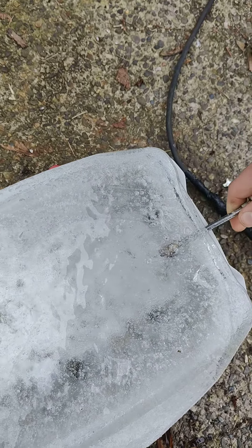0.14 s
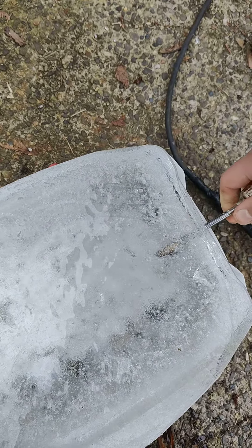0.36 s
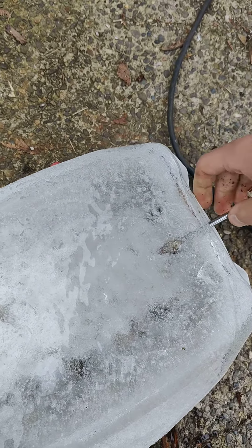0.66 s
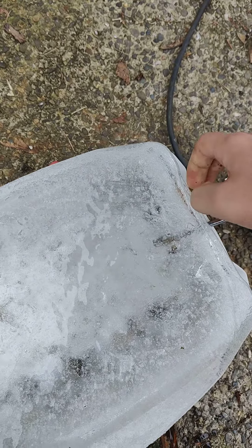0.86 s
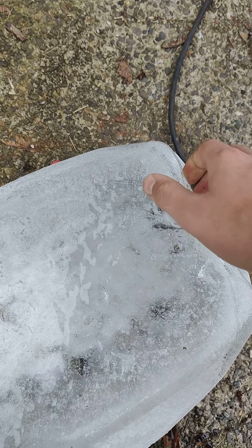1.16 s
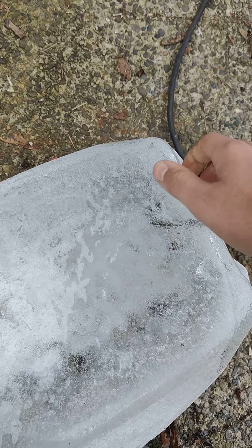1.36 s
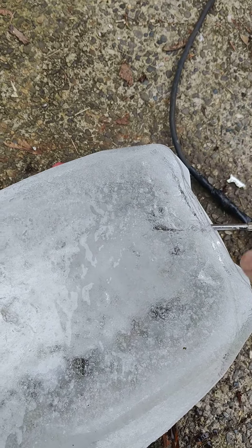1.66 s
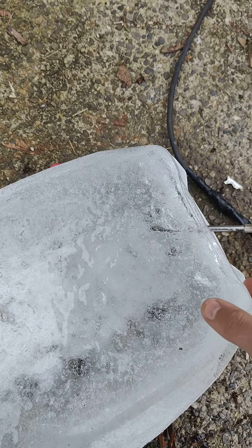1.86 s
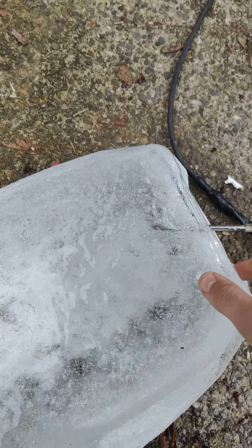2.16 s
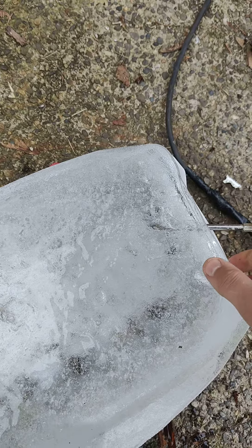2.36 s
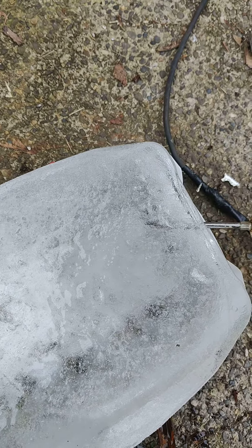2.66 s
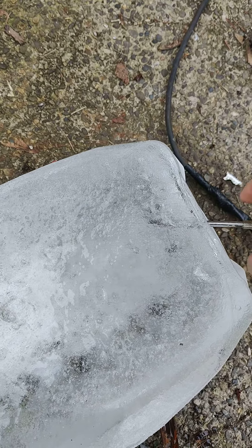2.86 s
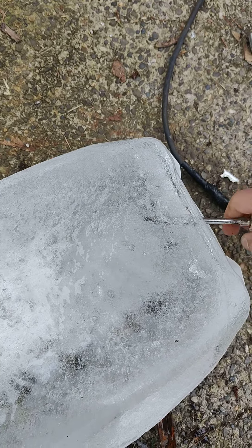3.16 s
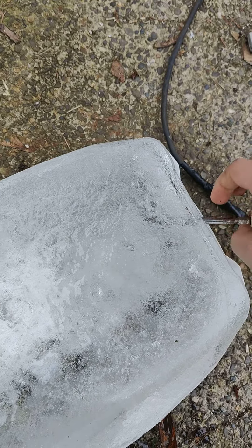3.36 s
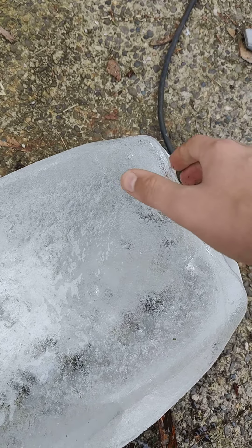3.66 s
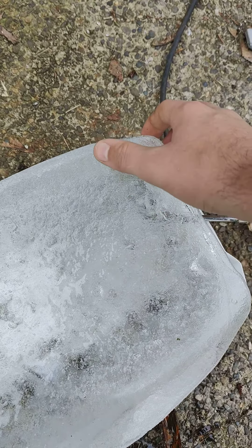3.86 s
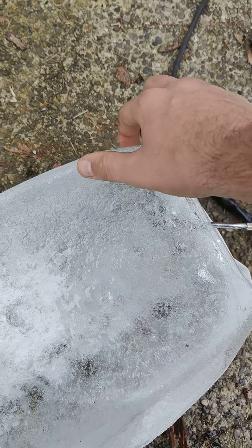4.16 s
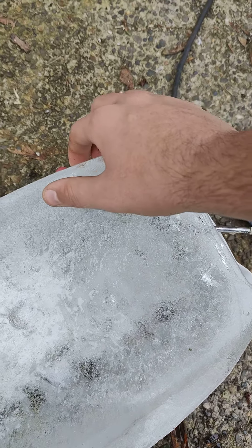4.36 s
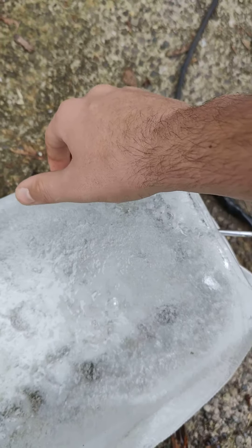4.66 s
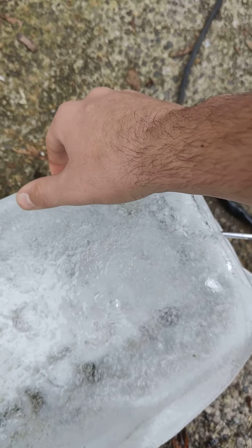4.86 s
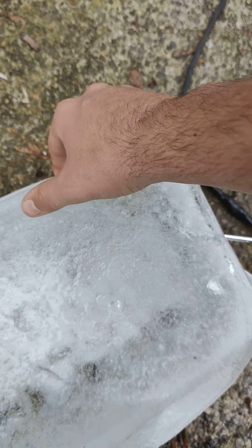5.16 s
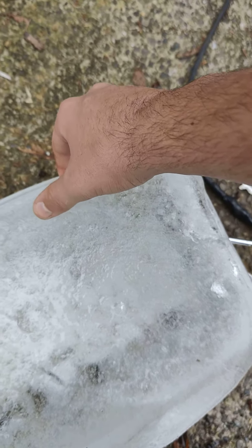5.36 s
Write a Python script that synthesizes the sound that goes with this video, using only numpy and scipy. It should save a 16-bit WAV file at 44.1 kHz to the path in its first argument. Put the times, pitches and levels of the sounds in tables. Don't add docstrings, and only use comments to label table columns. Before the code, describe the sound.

Close outdoor stereo phone pickup of a tub-shaped ice block on concrete being pried with a thin steel rod. Over low distant town rumble and soft hiss, one medium crack comes early, then faint ticks. A great double crack with a clear ring and hollow boom hits mid-way, followed by a tiny squeak, a lone sharp crack, and finally grinding and a cluster of heavy cracks.

```python
import sys
import numpy as np
from scipy import signal
from scipy.fft import rfft, irfft, next_fast_len
from scipy.io import wavfile
from scipy.ndimage import uniform_filter1d

SR = 44100
rng = np.random.default_rng(int(sys.argv[2]) if len(sys.argv) > 2 else 0)


def inscribe(sig):
    pcm = np.round(np.clip(np.atleast_2d(sig).T, -1, 1) * 32767)
    wavfile.write(sys.argv[1], SR, pcm.astype(np.int16))


def volts(x):
    e = np.asarray(x, float) / 20
    return 10 ** e


N = 242991
RING_LEN = 8192


def along(table, hz):
    f, v = np.transpose(table)
    return np.interp(np.log(np.maximum(hz, 1)), np.log(f), v)


def walk(rate):
    k = int(SR / rate)
    held = np.repeat(rng.standard_normal(N // k + 1), k)
    return uniform_filter1d(uniform_filter1d(held, k), k)[:N]


# frequency in Hz, level in dB per Hz.
TOWN_SPECTRUM = [(22, -5), (70, -1), (144, -8), (190, -6), (230, -12.5), (322, -20), (828, -23.5),
                 (1050, -19.5), (1700, -30.5), (3060, -27.5), (5480, -48.5), (7600, -51.5), (9200, -50.5),
                 (14000, -50.5)]
# frequency in Hz, shared fraction of power.
TOWN_COHERENCE = [(60, .995), (180, .99), (300, .95), (700, .6), (2000, .5), (6000, .3), (14000, .1)]
# frequency in Hz, left minus right in dB.
TOWN_BALANCE = [(60, 1.5), (110, 0.5), (200, -0.5), (380, 1), (700, 3), (1280, -1), (2370, 6), (4370, 9),
                (8060, 7.5), (14900, -0.5)]
TOWN_DB, TOWN_TOP_HZ, TOWN_LAG_S = -53.5, 14350, -.00043


def town():
    size = next_fast_len(N)
    hz = np.fft.rfftfreq(size, 1 / SR)
    shared = np.clip(along(TOWN_COHERENCE, hz), 0, 1)
    common, left, right = rfft(rng.standard_normal((3, size)))
    late = np.exp(-2j * np.pi * hz * TOWN_LAG_S)
    ports = np.sqrt(shared) * common * np.array([late, late ** 0])
    ports = ports + np.sqrt(1 - shared) * np.array([left, right])
    balance_db = along(TOWN_BALANCE, hz) * np.array([[.5], [-.5]])
    ports = ports * (hz < TOWN_TOP_HZ) * volts(along(TOWN_SPECTRUM, hz) + balance_db)
    out = 0
    swell = walk(1.0)
    octave = np.log2(np.maximum(hz, 20) / 20)
    for k in range(11):
        band = irfft(ports * np.clip(1 - abs(octave - k), 0, 1), size)[:, :N]
        out = out + band * volts(.6 * swell + 0.97 * walk(2.2) + 0.76 * walk(9))
    return out * volts(TOWN_DB) / np.sqrt(np.mean(np.mean(out, axis=0) ** 2))


# loudest moment in seconds,
# level in dB, half length in seconds.
MURMUR_SWELLS = [
    (0.337, -64.5, 0.16),
    (1.392, -67.5, 0.33),
    (1.77, -68.5, 0.3),
    (2.6, -66, 0.14),
    (5.19, -63.5, 0.075),
    (5.2, -61, 0.18),
]
DRONE_DB = -72


def low_murmur():
    band = signal.butter(N=2, Wn=[450, 640], btype="band", fs=SR, output="sos")
    drone = signal.sosfilt(band, rng.standard_normal((2, N)))
    t = np.arange(N) / SR
    near = volts(DRONE_DB) + sum(volts(db) * np.exp(-((t - s) / half_s) ** 2) for s, db, half_s in MURMUR_SWELLS)
    return drone / np.std(drone) * near * volts(-2.5 + 1.2 * walk(3.9))


def add(out, s, sound, db, pan_db):
    top = np.sqrt(uniform_filter1d(np.mean(sound ** 2, axis=0), size=132).max())
    gain = volts(db + np.array([[pan_db], [-pan_db]]) / 2) / top
    i = int(s * SR)
    out[:, i:i + RING_LEN] += (sound * gain)[:, :N - i]


def fade(t60):
    return np.exp(-np.log(1000) * np.arange(RING_LEN) / SR / max(t60, .004))


def excite(push, body):
    return signal.fftconvolve(np.atleast_2d(push), body, axes=1)[:, :RING_LEN]


YARD_T60_S, YARD_DB = 0.21, -22


def diffuse_swell(push, t60):
    decay = fade(t60)[None] ** 2 + (volts(YARD_DB) * fade(YARD_T60_S)[None]) ** 2
    return np.sqrt(excite(push ** 2, decay).clip(0))


def slips(run_ms, size):
    u = np.arange(RING_LEN) / SR / (max(run_ms, .3) / 1000)
    return (u + 0.17) * np.exp(-u * 2.0) * size


# frequency in Hz, lag of the right port in radians.
PORT_PHASE = [(250, 0.077), (440, 0.18), (900, 0.6), (1050, 1.9), (1700, 1.2), (2200, 3), (3200, 4.83)]
CROWD_SIZE, CROWD_LEN = 40, 3072


def crowd(band):
    low_hz, high_hz, t60 = band
    place, size, tilt, life = rng.random((4, CROWD_SIZE, 1))
    step = (np.arange(CROWD_SIZE)[:, None] + place) / CROWD_SIZE
    hz = low_hz * (high_hz / low_hz) ** step
    t = np.arange(CROWD_LEN) / SR
    body = volts(10.0 * size) * np.exp(-np.log(1000) * t / (t60 * (0.44 + 1.6 * life)))
    turn = 2 * np.pi * (hz * t + place * CROWD_SIZE)
    late = along(PORT_PHASE, hz) + 1.9 * (tilt - .5)
    return np.array([np.sum(body * np.sin(turn), axis=0), np.sum(body * np.sin(turn - late), axis=0)])


def crunch(band, push, noise):
    struck = excite(push, crowd(band))
    low_hz, high_hz, t60 = band
    hz = np.fft.rfftfreq(RING_LEN, 1 / SR)
    inside = 1 / (1 + (low_hz / np.maximum(hz, 1)) ** 8) / (1 + (hz / high_hz) ** 8)
    blur = diffuse_swell(push, t60) * irfft(rfft(noise) * inside)
    return struck / np.std(struck) + volts(-2.0) * blur / np.std(blur)


# frequency in Hz, level in dB per Hz.
SPLINTER_SPECTRUM = [(2590, -30.5), (4400, -2), (5800, -3), (6310, 2.5), (7810, -6.5), (9630, -7.5),
                     (13200, -7.5), (14600, -22.5), (15300, -42)]
# frequency in Hz, left minus right in dB.
SPLINTER_BALANCE = [(60, 7), (110, -1.5), (200, -1.5), (380, 2.5), (700, 0.5), (1280, -2), (2370, -4.5),
                    (4370, -5.5), (8060, 14.5), (14900, -6)]


def spray(noise):
    hz = np.fft.rfftfreq(noise.shape[1], 1 / SR)
    common, left, right = rfft(noise)
    late = np.exp(-2j * np.pi * hz * .0002)
    ports = np.array([common + .55 * left, common * late + 0.92 * right])
    balance_db = along(SPLINTER_BALANCE, hz) * np.array([[.4], [-.4]])
    return irfft(ports * volts(along(SPLINTER_SPECTRUM, hz) + balance_db), noise.shape[1])


# start in seconds, middle modes in dB, upper modes in dB, splinters in dB,
# run of slips in ms.
BIG_BREAKS = [
    (0.1863, -29, -23.5, -36, 3.24),
    (2.57, -15, -22, -38, 4.3),
    (2.6, -20, -19.5, -32.5, 1.4),
    (2.6294, -48.5, -41, -63.5, 1.35),
    (3.5087, -28.5, -32.5, -56, 1.73),
    (4.7752, -32.5, -27.5, -36.5, 4.8),
    (5.0786, -16.5, -18.5, -32, 4.8),
    (5.1351, -21.5, -26, -42.5, 4.3),
    (5.1585, -19.5, -28, -49, 5),
    (5.1956, -39, -39, -53, 2.8),
]
# start in seconds, middle modes in dB, upper modes in dB, splinters in dB.
HAIRLINE_TICKS = [(0.4532, -49, -46.5, -59), (0.469, -52, -79, -68), (0.587, -59, -76, -78),
                  (0.6393, -67, -65, -75), (0.6935, -59, -59, -69.5), (0.8592, -68, -59.5, -77),
                  (2.1944, -65, -77, -76.5), (2.3366, -51.5, -52.5, -58.5), (2.392, -57, -63, -69),
                  (2.4313, -52.5, -75, -73), (2.68, -57, -52, -66), (2.77, -61.5, -70, -76.5),
                  (3.3502, -79, -67, -80), (3.4239, -75.5, -61, -72.5), (4.7243, -61.5, -54, -67.5),
                  (4.7994, -51, -43.5, -77), (4.9243, -48, -55.5, -68), (5.005, -50.5, -56, -69),
                  (5.3845, -54, -77, -88.5), (5.396, -53, -55.5, -72.5), (5.4204, -64, -56.5, -73.5),
                  (5.4925, -59.5, -54.5, -68.5)]
MIDDLE, UPPER = (900, 2900, 0.067), (2400, 4500, 0.037)
TICK_RUN_MS, CRACK_PAN_DB = 5.5, 0.3
SPLINTER_T60_S = 0.032
GRAIN_DB, GRAIN_MS = 3, 2.1


def fractures():
    out = np.zeros((2, N))
    octaves = np.log2(np.maximum(np.fft.rfftfreq(RING_LEN, 1 / SR), 4000) / 7000)
    ticks = [(*tick, TICK_RUN_MS) for tick in HAIRLINE_TICKS]
    for s, middle_db, upper_db, splinter_db, run_ms in sorted([*BIG_BREAKS, *ticks]):
        grit = rng.standard_normal((6, RING_LEN))
        push = slips(run_ms, grit[0] ** 3)
        start = s - .0015
        add(out, start, crunch(MIDDLE, push, grit[4:]), middle_db - 1.85, CRACK_PAN_DB)
        add(out, start, crunch(UPPER, push, grit[4:]), upper_db - 4.5, CRACK_PAN_DB - 5.5)
        clumps = uniform_filter1d(grit[5, ::-1], max(int(GRAIN_MS * SR / 1000), 2))
        swell = diffuse_swell(push, SPLINTER_T60_S) * volts(GRAIN_DB * clumps / clumps.std())
        bright = volts(0.57 * np.clip(splinter_db - upper_db + 22, -12, 6) * octaves)
        hiss = irfft(rfft(spray(grit[1:4])) * bright)
        add(out, start, swell * hiss, splinter_db + 2.0, CRACK_PAN_DB + 0.5)
    return out


GRIP_S = 0.066


def ring(out, s, db, hz, t60, pan_db, rise_ms):
    t = np.arange(RING_LEN) / SR
    rise = (1 - np.exp(-t * 1000 / max(rise_ms, .2))) ** 2
    turn = 2 * np.pi * hz * t - np.array([[0], [along(PORT_PHASE, hz)]])
    choke = np.exp(-(t / GRIP_S) ** 4)
    add(out, s - .001, rise * fade(t60) * choke * np.sin(turn), db - 0.5, pan_db)


# frequency in Hz, creep in Hz per second, t60 in seconds,
# left minus right in dB, lag in ms.
LOW_SHORT_MODES = [(259, -0.5, 0.047, 5.5, 0.24), (508, 6, .04, 8.5, 1.5), (706, 1.5, .055, 4, 2.2),
                   (910.7, -7.5, .08, -7.5, 0.068)]
HIGH_SHORT_MODES = [(1225, 15, 0.038, 2, 0.1), (1618.5, 27.5, 0.042, -16.5, 4), (2096, 0.5, .026, -13, 1.5),
                    (3300, -25, 0.014, 9.5, 0.5)]
# start in seconds, then a level in dB for each of the four modes.
LOW_DRIVE = [(0.186, -69, -36, -71, -30), (2.567, -28, -22, -49, -27), (2.598, -48, -39, -37.5, -60),
             (2.657, -77, -51, -65, -54), (2.675, -80, -80, -72, -48.5), (3.507, -57.5, -40, -48, -36),
             (4.775, -58, -43, -51, -67.5), (5.077, -28, -20.5, -25.5, -23.5), (5.134, -43, -36, -37, -35),
             (5.156, -42, -29, -31, -53), (5.195, -80, -80, -72, -49), (5.388, -76.5, -78.5, -73.5, -60.5)]
HIGH_DRIVE = [(0.186, -34, -33, -31, -26.5), (2.571, -30, -35, -41, -43), (2.601, -52, -32, -28, -16.5),
              (3.5098, -31.5, -33, -31.5, -49), (4.7731, -44, -43.5, -38, -30.5),
              (5.078, -34.5, -24, -35, -26.5), (5.134, -23.5, -37, -50, -39), (5.155, -26.5, -38, -50, -43),
              (5.39, -50, -67, -82.5, -83)]
LOW_RISE_MS, HIGH_RISE_MS = 2.5, 0.79


def shorter_modes():
    out = np.zeros((2, N))
    low = (LOW_SHORT_MODES, LOW_DRIVE, LOW_RISE_MS)
    high = (HIGH_SHORT_MODES, HIGH_DRIVE, HIGH_RISE_MS)
    for modes, blows, rise_ms in (low, high):
        for s, *force_db in blows:
            for (hz, creep, t60, pan_db, lag_ms), db in zip(modes, force_db):
                ring(out, s + lag_ms / 1000, db, hz + creep * s, t60, pan_db, rise_ms)
    return out


# start in seconds, level in dB, left minus right in dB, build-up in ms.
BENDING_NOTES = [(0.187, -31, -2, 2.1), (0.4522, -54, -4.5, 1.3), (2.0768, -62, 0, 0.97),
                 (2.0937, -66.5, -16, 1.2), (2.3908, -66, -7, 1.6), (2.4354, -62, -13, 1),
                 (2.5685, -8, -3, 2.3), (2.5997, -40, -6, 1.3), (2.6573, -41.5, 0, 1.7),
                 (2.701, -49, -11, 0.69), (2.743, -60, -4.5, 3.9), (2.8274, -60, -2.5, 2.7),
                 (3.419, -63.5, -5.5, 1.65), (3.5057, -18, -8, 3.3), (4.772, -38, -9.5, 2.14),
                 (5.006, -57.5, -6, 1.5), (5.0819, -21.5, -9.5, 2.4), (5.1357, -38, -13, 1.5),
                 (5.1545, -23.5, -7, 0.66), (5.195, -51, -9, 1.5)]
LOOSE_S = 2.59
NOTE_HZ, NOTE_T60_S = (1010, 1042.7), 0.079


def bending_note():
    out = np.zeros((2, N))
    for s, db, pan_db, rise_ms in BENDING_NOTES:
        ring(out, s, db, NOTE_HZ[s > LOOSE_S], NOTE_T60_S, pan_db, rise_ms)
    return out


# start in seconds, level in dB, t60 in
# seconds, left minus right in dB.
HOLLOW_BOOMS = [(0.189, -30, 0.036, 0.5), (0.242, -49, 0.066, 2), (0.453, -49, 0.059, 1),
                (0.853, -59.5, 0.04, 2), (2.075, -43.5, 0.03, -.5), (2.092, -49, 0.056, 4),
                (2.348, -58, .065, -6), (2.418, -55, 0.09, 1), (2.567, -20, 0.058, 4),
                (2.584, -31, 0.036, -7), (2.597, -16.5, 0.11, 3), (2.668, -44, 0.059, -3),
                (2.701, -50.5, 0.066, -3.5), (3.506, -31.5, 0.033, 3.5), (4.177, -50, 0.015, -14),
                (4.519, -59.5, .088, 5), (4.583, -51, 0.026, -10.5), (4.735, -56, 0.14, 3),
                (4.777, -31.5, 0.093, 5), (4.819, -47, 0.047, -9), (4.92, -58, 0.076, 2.5),
                (4.962, -51, 0.056, 3.5), (5.007, -50.5, 0.11, 5.5), (5.0762, -10.5, 0.069, 4),
                (5.134, -32.5, 0.063, 5), (5.157, -24.5, 0.088, 5.5), (5.195, -42, 0.11, -2),
                (5.388, -54.5, 0.044, 3)]
BOOM_HZ, BOOM_RISE_MS = (413.7, 438.2), 3.4


def hollow_boom():
    out = np.zeros((2, N))
    for s, db, t60, pan_db in HOLLOW_BOOMS:
        ring(out, s, db, BOOM_HZ[s > LOOSE_S], t60, pan_db, BOOM_RISE_MS)
    return out


THUMP_HZ, THUMP_DB, THUMP_T60_S = 200, -11, 0.073


def ground_thump():
    out = np.zeros((2, N))
    for s, db, *_ in LOW_DRIVE:
        ring(out, s + 0.0045, db + THUMP_DB, THUMP_HZ, THUMP_T60_S, 1.5, LOW_RISE_MS)
    return out


# start in seconds, end in seconds, first level in dB, last level in dB.
GRINDS = [
    (2.307, 2.46, -82, -83),
    (2.609, 2.795, -77, -81),
    (4.7, 4.804, -84.5, -67.5),
    (4.808, 5.06, -72.5, -77.5),
    (5.2, 5.27, -75, -76),
    (5.37, 5.51, -81, -84),
]


def grind():
    t = np.arange(N) / SR
    bed = spray(rng.standard_normal((3, next_fast_len(N))))[:, :N] * volts(3.5 + 4.2 * walk(110))
    effort = 0
    for a, b, from_db, to_db in GRINDS:
        effort = effort + volts(np.interp(t, [a, b], [from_db, to_db], left=-140, right=-140))
    return bed / np.std(bed) * uniform_filter1d(effort, size=400)


# time in seconds, pitch in Hz, level in dB.
SQUEAK_PATH = [
    (2.696, 1050, -66),
    (2.704, 1200, -54),
    (2.712, 1650, -52),
    (2.719, 1770, -53),
    (2.738, 1780, -61),
    (2.755, 1830, -72),
]


def squeak():
    s, hz, db = np.transpose(SQUEAK_PATH)
    t = np.arange(N) / SR
    pitch = np.interp(t, s, hz) * (1 + .045 * walk(200))
    turn = 2 * np.pi * np.cumsum(pitch) / SR
    level_db = np.interp(t, s, db, left=-140, right=-140) + 2.5 * walk(160)
    return volts(level_db) * np.sin(turn - np.array([[0], [1.2]]))


def scene():
    block = shorter_modes() + bending_note() + hollow_boom() + ground_thump()
    return town() + low_murmur() + fractures() + block + grind() + squeak()


def band_limit(x):
    return signal.sosfilt(signal.butter(12, 15400, fs=SR, output="sos"), x)


ROUND_AT, TOP_HZ = 3.3, 14800


def record(dry):
    rounded = np.tanh(dry / ROUND_AT) * ROUND_AT
    low_pass = signal.ellip(4, .3, 22, TOP_HZ, fs=SR, output="sos")
    mix = signal.sosfilt(low_pass, rounded)
    return band_limit(mix)


dry = scene()
out = record(dry)
inscribe(out)
```